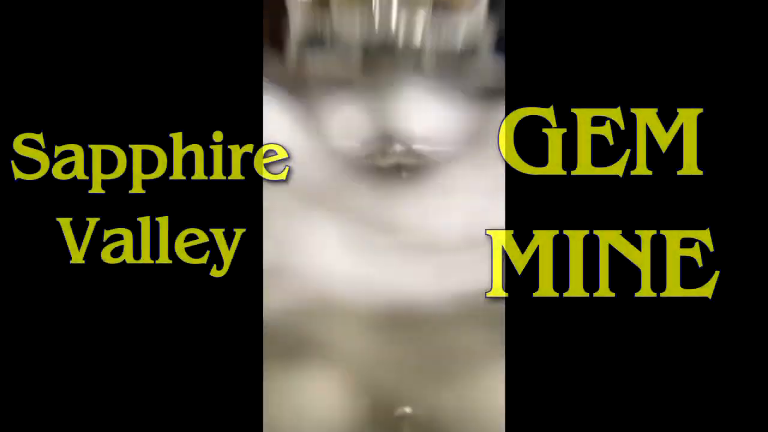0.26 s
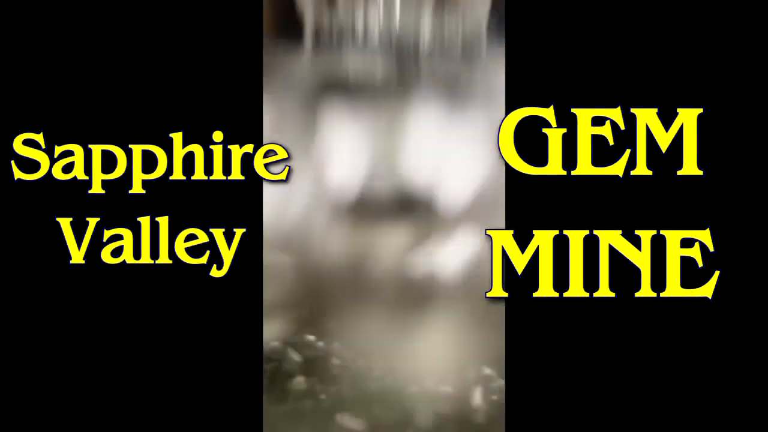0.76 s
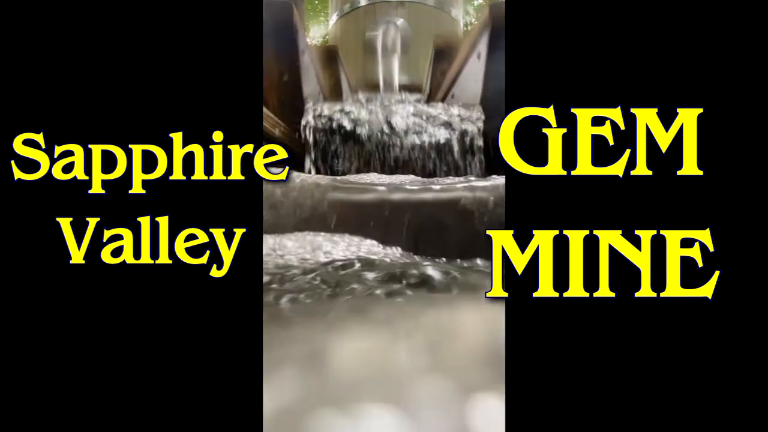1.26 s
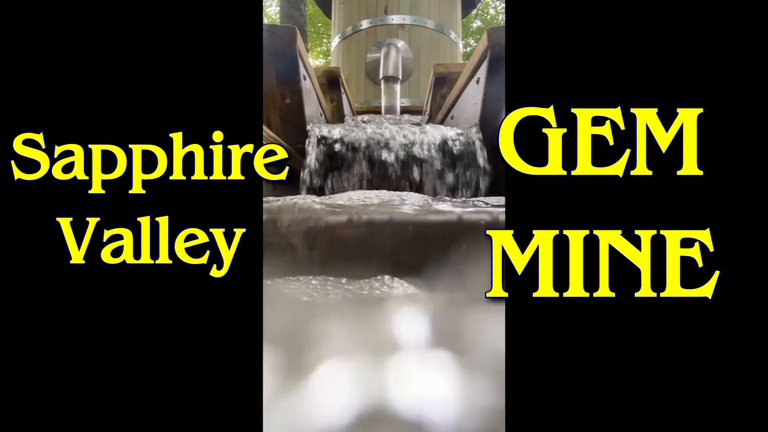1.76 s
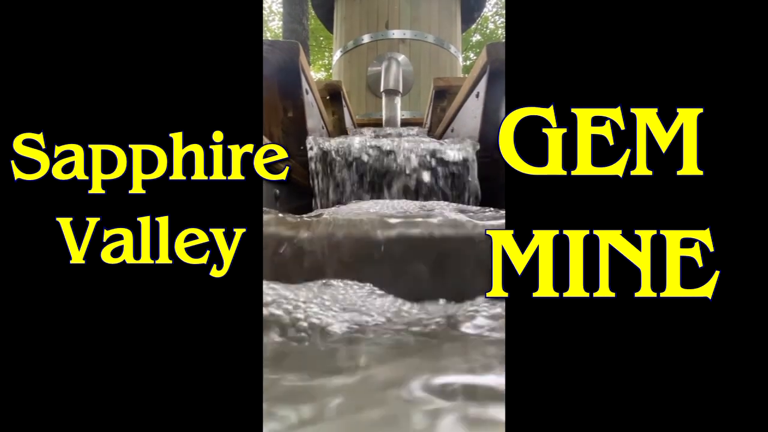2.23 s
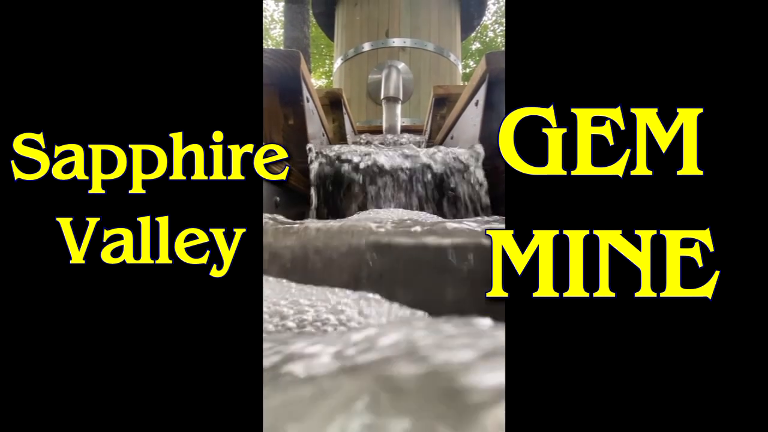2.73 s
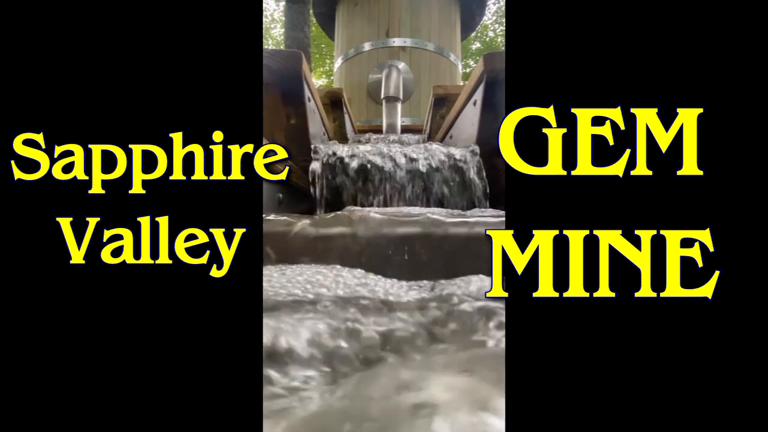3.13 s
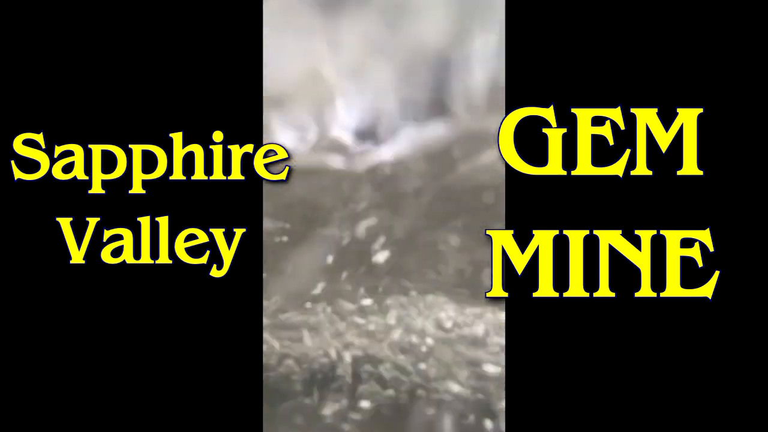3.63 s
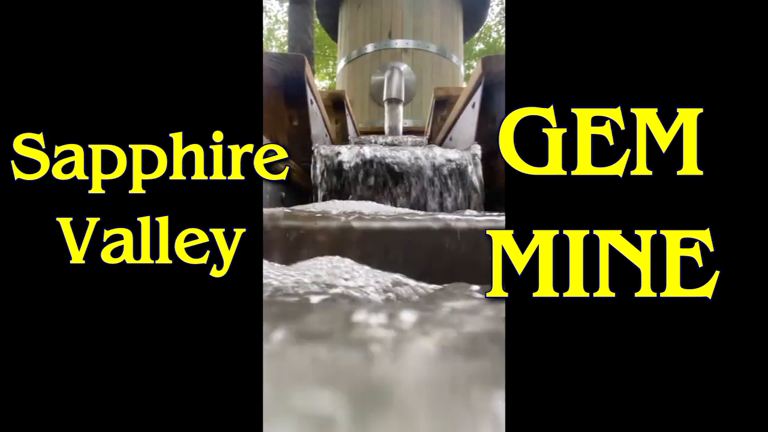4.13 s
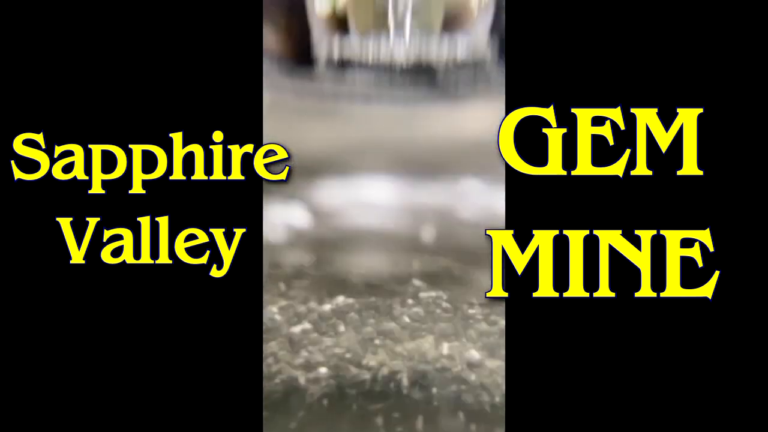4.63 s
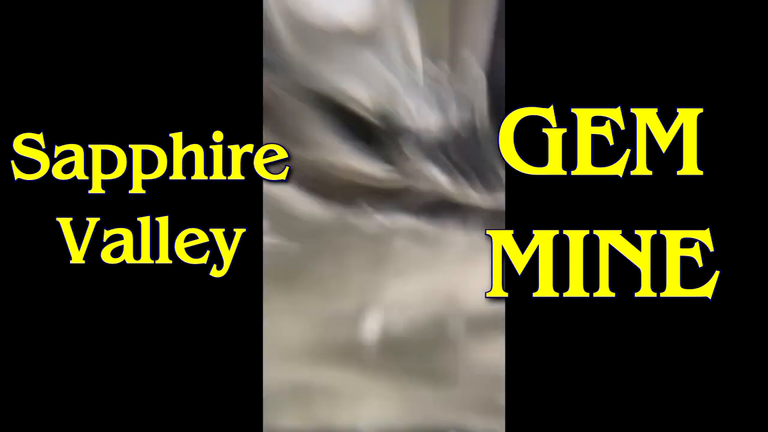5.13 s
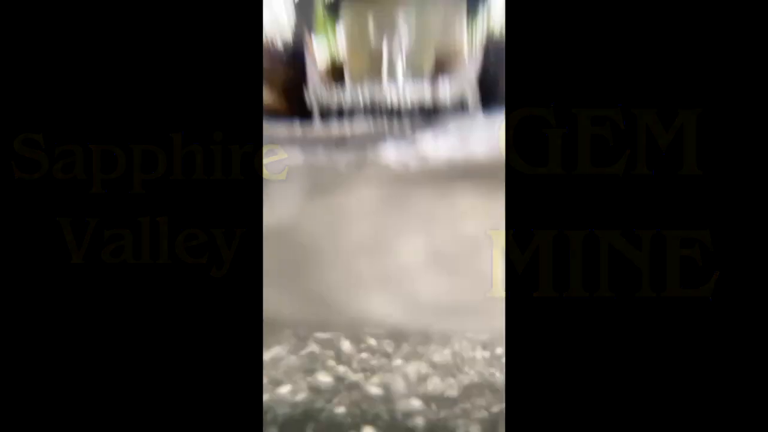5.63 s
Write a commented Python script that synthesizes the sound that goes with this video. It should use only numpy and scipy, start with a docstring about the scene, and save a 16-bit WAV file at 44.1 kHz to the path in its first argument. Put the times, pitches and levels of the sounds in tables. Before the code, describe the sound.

A steady pour of water over gravel in a wooden sluice, heard very near with little echo. Ringing bubbles, hissing spray, sharp ticks, small wet smacks and clear drops flicker over low gurgling. Halfway through, close waves glug three times in quick succession and a dull rolling bass joins the stronger, brighter flow before it fades out.

```python
"""Water pours over a step into a gravel sluice, heard from just above the stream.
Swarms of ringing bubbles and noise gurgle, splash and fizz in the wooden trough; splash and fizz grow
with the flow, and the splash brightens. Single drops plink, flung water smacks, air pockets gulp.
Halfway through, three waves slosh close by, each with a quick double glug of sinking pitch, and the
bass fills out with low rolling noise. Sharp ticks dot the sound, which fades out at the end."""
import sys
import numpy as np
from scipy import signal
from scipy.fft import rfft, irfft, next_fast_len
from scipy.io import wavfile
from scipy.ndimage import map_coordinates

SR = 44100
rng = np.random.default_rng(int(sys.argv[2]) if len(sys.argv) > 2 else 0)


def persist_wave(psi):
    """Save psi, clipped to +-1, as 16-bit WAV."""
    counts = np.round(np.clip(psi, -1, 1) * 32767).astype(np.int16)
    wavfile.write(sys.argv[1], SR, np.atleast_2d(counts).T)


N = 259308  # length in samples
TIME = np.arange(N) / SR  # seconds


def amp(db):
    """Turn decibels into a factor."""
    return 10 ** (np.asarray(db) / 20)


LEAN_LEFT = amp([[1], [-1]])  # left 1 dB up, right 1 dB down


def unit(x):
    """Scale a sound to an average (RMS) strength of 1."""
    return x / np.sqrt(np.mean(x ** 2) + 1e-20)


def along(points, hz):
    """Read a curve of (Hz, value) points on a logarithmic pitch axis."""
    point_hz, value = np.transpose(points)
    return np.interp(np.log(hz + 1), np.log(point_hz + 1), value)


def curves(rows):
    """Give one value per sample for each column after the time."""
    s, *columns = np.transpose(rows)
    return [np.interp(TIME, s, column) for column in columns]


def wobble(rate):
    """A smooth random curve with this many random points a second."""
    knots = rng.standard_normal(int(N * rate / SR) + 4)
    return map_coordinates(knots, [TIME * rate])


def filtered(x, response):
    """Multiply each frequency of a sound by a response, which may shift phase too."""
    size = next_fast_len(N + SR // 2)
    spectrum = rfft(x, size) * response(np.fft.rfftfreq(size, 1 / SR))
    return irfft(spectrum, size)[..., :N]


def coloured(x, spectrum, resonances=(), size=8192):
    """Give a sound a spectrum, with resonances that ring only after each grain, never before."""
    hz = np.fft.rfftfreq(size, 1 / SR)
    db = along(spectrum, hz)
    for centre_hz, width_hz, gain_db in resonances:
        db = db + gain_db / (1 + (2 * (hz - centre_hz) / width_hz) ** 2)
    # folding the cepstrum (the transform of the log spectrum) makes the filter causal
    cepstrum = irfft(np.log(amp(db)))
    cepstrum[1:size // 2] *= 2
    cepstrum[size // 2 + 1:] = 0
    impulse = irfft(np.exp(rfft(cepstrum)))
    return signal.fftconvolve(x, impulse[None], axes=1)[:, :N]


def add(track, s, sound):
    """Mix a sound into a track at time s."""
    start = max(round(s * SR), 0)
    part = track[..., start:][..., :sound.shape[-1]]
    part += sound[..., :part.shape[-1]]


def bubble(cycle, life, rise, phase=0):
    """A bubble's ring against its count of cycles: it dies away while its pitch climbs."""
    age = cycle / life
    attack = 1 - np.exp(-2 * cycle)
    turns = cycle * (1 + rise * age / 2)
    return attack * np.exp(-age) * np.sin(2 * np.pi * turns + phase)


def swarm(rate, low_hz, high_hz, life, spread_db, width, wash_db, size):
    """Stereo bubbles of random pitch, strength and life over the wash of those too small to tell apart."""
    count = int(rate * N / SR)  # rate: bubbles a second
    when, pitch, strength, place, damping = rng.random((count, 5)).T[..., None]
    hz = low_hz * (high_hz / low_hz) ** pitch
    gain = hz * amp(-spread_db * np.log(1 - .98 * strength))
    cycles = life * 2 ** (3 * damping - 1.5)
    cycle = hz * np.arange(size) / SR
    index = ((when * N).astype(int) + np.arange(size)).ravel()
    taper = np.linspace(1, 0, size)
    channels = []
    for side in (1, -1):
        # each bubble reaches the two channels with a phase set by its place
        phase = side * width * (2 * place - 1)
        ring = gain * bubble(cycle, cycles, 0.031, phase)
        channels.append(np.bincount(index, (ring * taper).ravel(), N)[:N])
    middle, sides = rng.standard_normal((2, N))
    wash = unit(np.array([middle + sides * width / 2, middle - sides * width / 2]))
    # the wash is weaker for swarms that reach higher in pitch
    wash_gain = amp(wash_db) * np.sqrt(SR / 2 / high_hz)
    return unit(np.array(channels)) + wash_gain * wash


def spatter(low_hz, high_hz, life):
    """A dying crackle of tiny droplets between two pitches; life in seconds."""
    t = np.arange(SR // 16) / SR
    band = signal.butter(3, [low_hz, min(high_hz, SR / 3)], "band", fs=SR, output="sos")
    landed = rng.random(len(t)) < .15
    droplets = rng.standard_normal(len(t)) * landed
    return unit(signal.sosfilt(band, droplets)) * np.exp(-t / life)


def walls(x, t60):
    """The short scattered answer of the trough's sides, falling 60 dB in t60 seconds."""
    t = np.arange(SR // 10) / SR
    tail = rng.standard_normal((2, len(t))) * amp(-60 * t / t60) * (t > .002)
    return signal.fftconvolve(x, tail / np.linalg.norm(tail[0]), axes=1)[:, :N]


def churn():
    """The dull rolling of the water under the surface: low noise of wavering strength."""
    # spectrum of the rolling: pitch_hz, relative level_db per Hz
    rumble = [(20, -49.5), (35, -15), (65, 1), (120, 3), (160, -3.5), (210, -11), (270, -26.5), (400, -64)]
    # how strong the rolling is, before the random wobble: time_s, level_db
    strength = [(.27, -52), (.31, -60), (.6, -75.5), (.95, -61), (1.5, -59.5), (1.85, -51), (2.7, -58.5),
                (2.8, -64), (2.92, -63.5), (3.1, -39.5), (3.6, -42.5), (4.4, -40.5), (5.5, -45)]
    roll = unit(coloured(rng.standard_normal((1, N)), rumble))
    level_db, = curves(strength)
    return roll * amp(level_db + 3 * wobble(25))


def ticks():
    """Sharp ticks: a millisecond or two of bright noise each."""
    # ticks: start_s, level_db before the colouring
    tick_list = [(0.26, -29.5), (1.106, -31), (1.34, -31), (2.537, -29), (3.4282, -43.5), (3.7227, -29.5),
                 (3.979, -30), (4.117, -24), (4.2527, -33), (4.874, -28.5), (5.169, -29.5)]
    life_s = 0.0016
    out, t = np.zeros((1, N)), np.arange(SR // 100) / SR
    for s, db in tick_list:
        add(out, s, amp(db) * np.exp(-t / life_s) * rng.standard_normal(len(t)))
    return coloured(out, [(500, -4.5), (3000, 8.5), (5500, 4.0), (8000, 5.5), (15000, -4.0)])


def slaps():
    """Flung water lands all at once: a sharp smack with no ring."""
    # flung water smacking down: start_s, level_db, lowest_hz, highest_hz
    smacks = [(0.143, -39, 700, 2000), (0.267, -20.5, 600, 1530), (0.955, -27, 600, 1490),
              (1.13, -39, 700, 1290), (1.903, -21, 1500, 2270), (2.343, -22.5, 3300, 5400),
              (2.516, -22, 3000, 5570), (2.728, -23.5, 3400, 6100), (2.951, -19.5, 3000, 5600),
              (3.059, -22.5, 600, 1400), (3.0875, -17, 450, 2200), (3.105, -20.5, 600, 1400),
              (3.1235, -13.5, 1550, 1900), (3.309, -31, 500, 1190), (3.5035, -24.5, 600, 1400),
              (4.265, -17.5, 1200, 2360), (5.201, -19.5, 600, 1700), (5.25, -18, 1800, 2760)]
    life_s = 0.0042
    out = np.zeros(N)
    for s, db, low_hz, high_hz in smacks:
        add(out, s, amp(db) * spatter(low_hz, high_hz, life_s))
    return out


def drops():
    """Each drop slaps the surface with a burst of spatter and rings a bubble it has trapped."""
    # the nearest drops: start_s, level_db before the overall trim, pitch_hz,
    # pan_db (left over right), spatter_db (compared with the ring)
    plinks = [(0.1415, -15, 2320, 2.5, -1), (0.2657, -16.5, 3110, 2, -15.5), (0.2806, -14, 3230, -2, -9),
              (0.3005, -26.5, 2013, 1.5, -5), (0.3115, -21, 3640, -2, -1), (0.3415, -26, 1630, 4, 5),
              (0.584, -23, 4870, 1, -8.5), (0.598, -21.5, 1180, 10, -5), (0.607, -16, 3000, -3, -7.5),
              (0.677, -28.5, 1266, 15, -9), (0.6788, -25.5, 2440, 0, 4), (0.911, -13, 3230, 0, -22),
              (0.9291, -13, 3080, 0, -11.5), (1.1537, -15.5, 2570, -2, -17), (1.197, -20, 1868, -7, -14),
              (1.374, -19, 4900, 0, -13), (1.6218, -12, 2890, 0, -17), (1.6618, -18, 1730, -9, -10),
              (1.696, -16, 3900, 1, -16), (1.886, -21.5, 1609, -6, -14), (2.2409, -14.5, 1593, -4.5, -25),
              (2.342, -13.5, 3240, -5.5, -19), (2.37, -11.5, 3290, 1, -20), (2.431, -22, 1210, -7, -11),
              (2.4413, -16, 3170, -5, -9), (2.5172, -13.5, 3900, 7, -23), (2.9203, -15, 3350, 1.5, -24),
              (2.95, -15.5, 4560, 1, -17.5), (3.0704, -12.5, 1990, 6.5, -9.5),
              (3.096, -13.5, 3450, -1, -13), (3.122, -14, 1100, 3.5, -15), (3.245, -13.5, 4000, -3.5, -22),
              (3.371, -11.5, 2100, 6.5, -25.5), (3.5365, -19, 2060, -1.5, -15.5),
              (3.6408, -12.5, 2120, 4, -26), (3.722, -14, 3280, 0, -18.5), (3.788, -15.5, 1890, 2, -5),
              (3.989, -18.5, 1270, 9, -17), (4.028, -13.5, 1880, 3, -22), (4.1474, -12.5, 3120, 2, -12.5),
              (4.2025, -18, 1990, -5.5, -18), (4.2652, -13, 1510, 3, -13), (4.2659, -9, 2060, 6.5, -11),
              (4.4835, -19.5, 1850, -2, -22), (4.791, -13, 1624, -8, -9.5), (4.943, -22, 1320, 7, -23),
              (4.9573, -11.5, 878, 4, -10), (5.0173, -18, 3200, -0.5, -3), (5.2037, -13, 1910, -1, -9.5),
              (5.302, -27, 1215, 0, 3), (5.3865, -13.5, 1690, 1, -14), (5.4818, -19.5, 1910, -2, -13),
              (5.5632, -12.5, 1950, 3, -31)]
    life_cycles, attack_s, spatter_s, trim_db = 8, .0005, 0.0051, -1.5
    out, t = np.zeros((2, N)), np.arange(SR // 16) / SR
    swell = 1 - np.exp(-t / attack_s)
    for s, db, hz, pan_db, spatter_db in plinks:
        ring = bubble(hz * t, life=life_cycles, rise=0.0092)
        burst = amp(spatter_db) * spatter(hz / 3, hz * 1.16, spatter_s)
        gain = amp(db + trim_db + np.array([[.5], [-.5]]) * pan_db)
        add(out, s, gain * swell * (ring + burst))
    return out


def gulps():
    """Large air pockets swell and ring, with little far below their pitch; the long-lived ones sing."""
    # the largest air pockets: start_s, level_db before the swell, filter and lean, pitch_hz, life_cycles
    pockets = [(0.005, -2.5, 563, 0.74), (0.016, -13.5, 631, 8), (0.071, -27.5, 362.5, 19),
               (0.141, -10.5, 800, 2), (0.265, -9.5, 757, 2.3), (0.266, -34, 191, 2.8),
               (0.385, -28, 793, 24), (0.413, -19, 875, 24), (0.441, -30, 370, 14),
               (0.598, -13.5, 550, 1.7), (0.954, -7.5, 830, 1.7), (0.994, -20.5, 487, 14),
               (1.128, -17, 890, 2.8), (1.204, -20, 523, 6.9), (1.261, -13.5, 491, 9.4),
               (1.279, -15.5, 538, 3.7), (1.355, -26, 501, 8.9), (1.45, -24.5, 539, 17),
               (1.63, -10.5, 573, 2.9), (1.632, -21, 296, 2.9), (1.743, -12, 315, 3.5),
               (1.995, -17, 321, 7.9), (2.024, -16.5, 348, 4.6), (2.073, -11.5, 340, 3.5),
               (2.316, -14.5, 780, 2.5), (2.362, -17.5, 341, 5.4), (2.364, -14, 710, 3.4),
               (2.629, -11.5, 860, 3.1), (2.645, -12.5, 312, 3.5), (2.692, -12.5, 353, 3.4),
               (2.841, -7.5, 324, 2), (2.983, -11, 364, 3), (3.039, -7, 367, 2.2), (3.0585, -7, 620, 2.1),
               (3.074, -10.5, 608, 2.1), (3.107, -5.5, 400, 4), (3.532, -13, 758, 4.8),
               (3.536, -16, 504, 3.4), (3.566, -13.5, 340, 4), (3.809, -14, 367, 2.8),
               (3.9, -10.5, 362, 4.4), (3.968, -10, 310, 1.7), (4.231, -12.5, 347, 5.9),
               (4.272, -12, 816, 6.4), (4.337, -12, 804, 4.7), (4.758, -13, 859, 5),
               (4.79, -16.5, 742, 6.8), (4.892, -4.5, 298, 1.55), (4.965, -12, 328, 1.5),
               (5.173, -8, 307, 1.3), (5.197, -19, 794, 3.9), (5.268, -12, 275, 2),
               (5.462, -14.5, 342, 3.2), (5.478, -11, 275, 2.1)]
    swell_share = 0.3  # swelling time as a share of the pocket's life
    out, t = np.zeros(N), np.arange(SR // 5) / SR
    for s, db, hz, cycles in pockets:
        swell = 1 - np.exp(-hz * t / (swell_share * cycles))
        ring = swell * bubble(hz * t, life=cycles, rise=0.01)
        edge = signal.butter(8, .78 * hz, "high", fs=SR, output="sos")
        add(out, s, amp(db) * signal.sosfilt(edge, ring))
    return out * LEAN_LEFT


def glugs():
    """Cavities open in a wave's wake, each falling in pitch as it grows, with a splash around it."""
    # cavities close to the listener, two to a wave:
    # start_s, level_db before the swell and lean, first_hz, last_hz
    cavities = [(3.1261, -5, 656, 160), (3.134, -11.5, 199.3, 85), (3.3102, -9, 953, 244),
                (3.3214, -14.5, 402, 111), (3.5044, -12.5, 1270, 250), (3.5124, -12, 428, 104)]
    fall_s, attack_s, life_s = 0.003, 0.0008, 0.0095
    spatter_db = -14.5  # added to the level of the ring
    out, t = np.zeros(N), np.arange(SR // 8) / SR
    swell = (1 - np.exp(-t / attack_s)) * np.exp(-(t / life_s) ** 2)
    for s, db, first_hz, last_hz in cavities:
        pitch = last_hz + (first_hz - last_hz) * np.exp(-t / fall_s)
        ring = np.sin(2 * np.pi * np.cumsum(pitch) / SR)
        add(out, s, amp(db) * swell * ring)
        add(out, s, amp(db + spatter_db) * spatter(last_hz, 1.1 * first_hz, 0.008))
    return out


def wave():
    """Waves slosh by in bursts of foam, a bubble swarm that surges and dies, with their glugs."""
    # bursts of foam from the waves: start_s, level_db before the lean, length_s
    bursts = [(3.041, -24, 0.1), (3.155, -27, 0.03), (3.317, -30.5, 0.018), (3.499, -25, 0.024)]
    # spectrum of the foam: pitch_hz, relative level_db per Hz
    foam_spectrum = [(50, -26.5), (140, 12.5), (350, -2.5), (700, -0.5), (1200, -13), (2000, -18),
                     (4000, -9.5), (8000, -50.5)]
    attack_s, release_s = 0.002, 0.0077
    foam = swarm(rate=1300, low_hz=180, high_hz=3000, life=3.5, spread_db=1.2, width=.3, wash_db=-9, size=700)
    surge = np.zeros(N)
    for s, db, length in bursts:
        rise = np.clip((TIME - s) / attack_s, 0, 1)
        fall = np.exp(-np.maximum(TIME - s - length, 0) / release_s)
        surge += amp(db) * rise * fall
    return (glugs() + unit(coloured(foam, foam_spectrum)) * surge) * LEAN_LEFT


def hollow(x, steepness, octaves):
    """The hollow of moving water: one moving resonance above a steep, moving low edge."""
    # the hollow that the gurgle rings in: time_s, low_edge_hz, resonance_hz,
    # resonance_db (boost or dip, before a boost is offset below)
    shape = [(.15, 356, 573, -2), (.33, 405, 546, -23), (.46, 356, 540, -26), (.58, 398, 570, 3.5),
             (.95, 358, 530, 6.5), (1.3, 425, 505, 4), (1.6, 286, 497, 7.5), (2.15, 293, 490, 9),
             (2.45, 306, 478, 7), (2.7, 287, 338, 7.5), (2.85, 160, 340, 4.5), (3.1, 45, 385, 6.5),
             (5.5, 45, 328, 2.5)]
    hz, t, z = signal.stft(x, SR, nperseg=2048, noverlap=1792)
    edge_hz, ring_hz, ring_db = (np.interp(t, TIME, c) for c in curves(shape))
    hz = hz[:, None] + 1
    cut = 1 / np.sqrt(1 + (edge_hz / hz) ** (2 * steepness))
    bump = np.exp(-(np.log2(hz / ring_hz) / octaves) ** 2)
    # a boost draws a share of its strength from all pitches
    ring = amp(ring_db * bump - 0.42 * np.maximum(ring_db, 0))
    return signal.istft(z * cut * ring, SR, nperseg=2048, noverlap=1792)[1][:, :N]


def gurgle(spurt):
    """Large bubbles ring low and gurgle in the hollow of the moving water."""
    # spectrum of the gurgle: pitch_hz, relative level_db per Hz
    spectrum = [(45, -13.5), (70, -19), (120, 2), (175, -8), (225, 1), (280, 5.5), (370, 1.5), (440, -6),
                (520, -4), (640, -4.5), (850, 0.5), (1000, -12), (1300, -29), (2500, -62.5)]
    # strength of the gurgle, before spurts, wobble, lean and the hollow: time_s, level_db
    strength = [(0, -22.5), (.2, -31.5), (.42, -27), (.55, -29), (.75, -26.5), (1.2, -29.5), (2, -28),
                (2.7, -27.5), (3.2, -27), (3.75, -30), (4.4, -26.5), (5.4, -27.5)]
    level_db, = curves(strength)
    large = swarm(rate=1100, low_hz=80, high_hz=1200, life=5.8, spread_db=1.4, width=.42, wash_db=-8.5, size=2200)
    sound = unit(coloured(large, spectrum)) * amp(level_db + 0.5 * spurt + 0.83 * wobble(22.11))
    return hollow(sound * LEAN_LEFT, steepness=14, octaves=0.19)


def splash(flow_db, spurt):
    """Small bubbles splash and set the trough ringing; a stronger flow tears off finer ones."""
    # spectrum of the splash: pitch_hz, relative level_db per Hz
    spectrum = [(250, -48.5), (500, -13.5), (1000, 4), (1350, 1), (1750, -2.5), (2300, -5.5), (2800, 0.5),
                (3600, -5), (4500, -13), (5400, -9), (6500, -8.5), (7500, -31.5), (10000, -71)]
    # resonances of the trough: pitch_hz, width_hz, gain_db
    trough = [(1610, 110, 4.5), (1777, 140, 6), (2023, 250, 9.5), (2560, 690, 4.5), (3198, 190, 10),
              (4000, 534, 10.5), (4960, 1080, 9.5)]
    base_db, grows = -34, 0.79  # level at flow 0 dB before spurts, dB gained per dB of flow
    fine_hz, fine_grows = 5000, 0.4  # above this pitch it gains this much more per dB of flow
    small = swarm(rate=5000, low_hz=900, high_hz=7500, life=9.5, spread_db=2.8, width=.68, wash_db=-7, size=700)
    sound = unit(coloured(small, spectrum, trough)) * amp(base_db + grows * flow_db + 0.94 * spurt)
    fine = filtered(sound, lambda hz: 1 / (1 + (fine_hz / (hz + 1)) ** 10))
    sound = sound + fine * (amp(fine_grows * flow_db) - 1)
    # a little of the fall comes by way of the walls
    return sound + amp(-15) * walls(sound, t60=0.03)


def fizz(flow_db, spurt):
    """Spray fizzes: the smallest, highest bubbles over a strong wash of noise."""
    # spectrum of the fizz: pitch_hz, relative level_db per Hz
    spectrum = [(4000, -31.5), (7500, -99), (8600, 7), (10000, 14), (11500, 6), (14000, 4.5), (16000, -8)]
    base_db, grows = -50.5, 0.83  # level at flow 0 dB before spurts, dB gained per dB of flow
    spray = swarm(rate=2400, low_hz=5500, high_hz=15500, life=18, spread_db=3, width=.55, wash_db=1, size=260)
    level_db = base_db + grows * flow_db + 1.1 * spurt + 0.66 * wobble(70)
    return unit(coloured(spray, spectrum)) * amp(level_db)


def stream():
    """The fall: spurts drive gurgle, splash and fizz together; the flow drives splash and fizz."""
    # strength of the stream: time_s, flow_db
    flow = [(0, 0.5), (.22, -3.5), (.55, -0.5), (.9, -4), (1.25, 1), (1.95, -1), (2.6, 2), (3.15, 2),
            (3.45, 3), (4.25, 2.5), (4.6, 1.5), (4.95, 4), (5.37, 3.5), (5.45, 2.5)]
    flow_db, = curves(flow)
    spurt = wobble(25) + 1.17 * wobble(90)
    return gurgle(spurt) + splash(flow_db, spurt) + fizz(flow_db, spurt)


def scene():
    """The stream with all its layers; the drops, smacks and ticks also echo off the walls."""
    near = drops() + slaps() + ticks()
    echo = amp(-8.0) * walls(near, t60=0.13)
    return churn() + near + echo + gulps() + wave() + stream()


def record(dry):
    """Shift left against right as two spaced ports would, fade to silence and cut the highest pitches."""
    # how far the left channel lags the right: pitch_hz, lag_radians
    lag = [(60, 0), (300, -.3), (1000, .05), (2000, .1), (2400, .9), (4000, .9), (4900, .2), (6000, 1.7),
           (7500, 3.1), (9000, 3.5), (10500, 4.8), (11800, 6.2), (14500, 6.4)]
    top_hz = 15750
    halves = np.array([[-.5], [.5]])  # half the lag on each channel
    spaced = filtered(dry, lambda hz: np.exp(1j * along(lag, hz) * halves))
    fade = np.clip((5.645 - TIME) / 0.16, 0, 1)
    return filtered(spaced * fade, lambda hz: hz < top_hz)


dry = scene()
out = record(dry)
persist_wave(out)
```